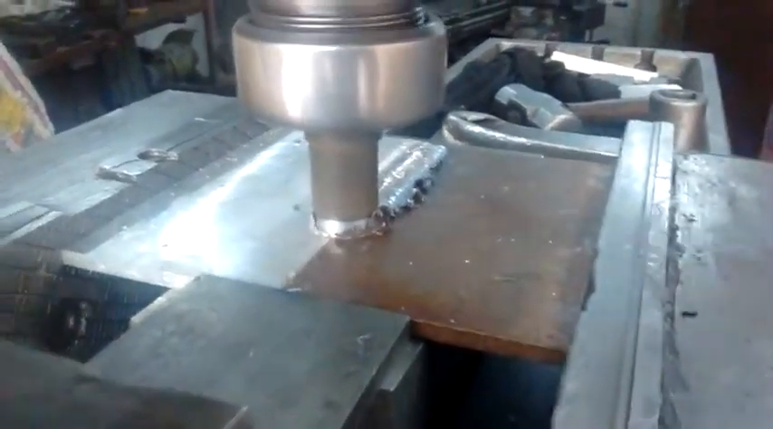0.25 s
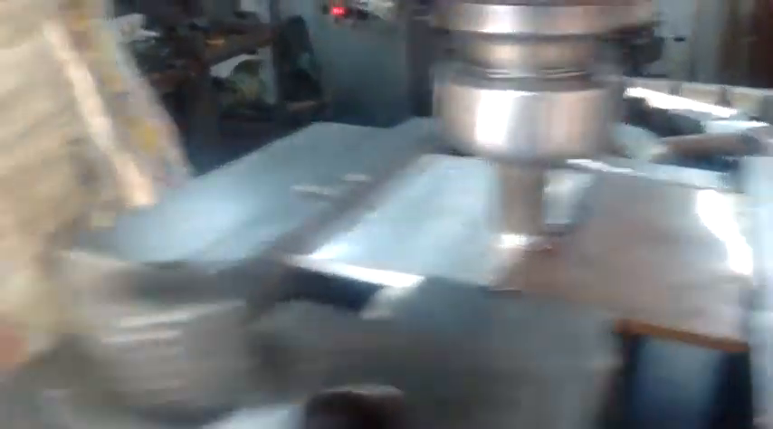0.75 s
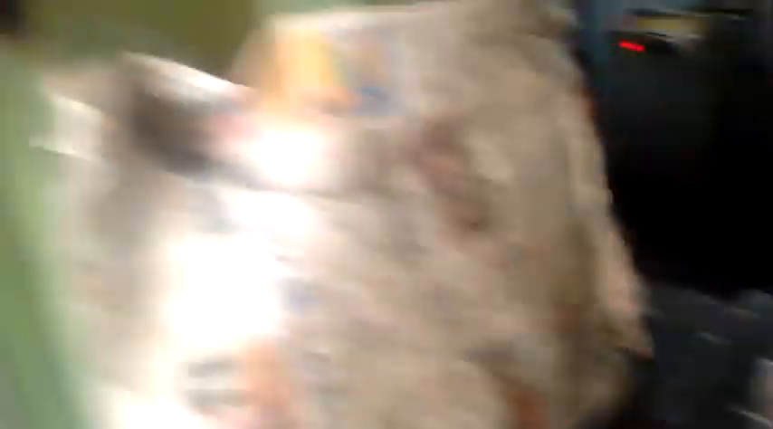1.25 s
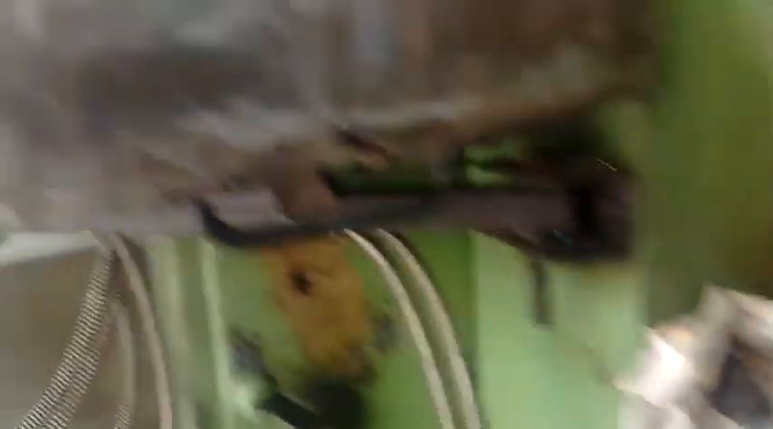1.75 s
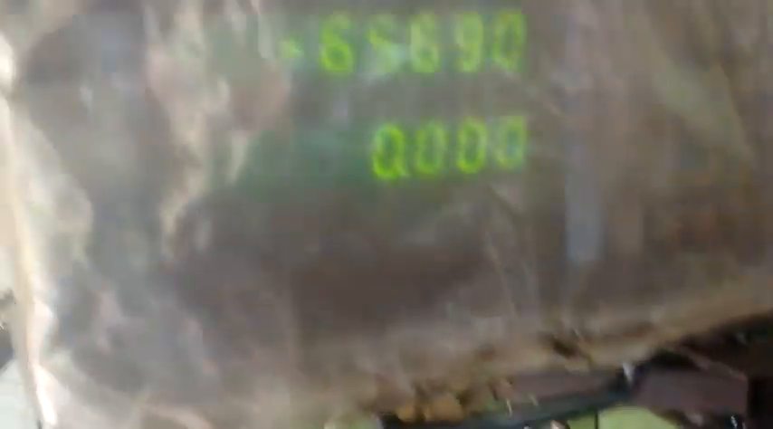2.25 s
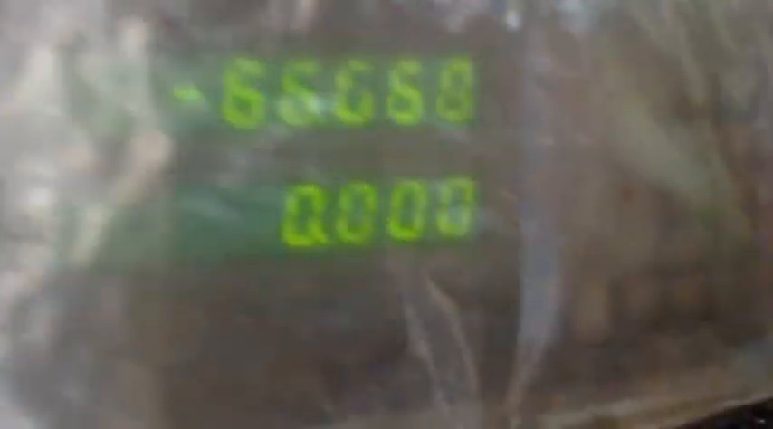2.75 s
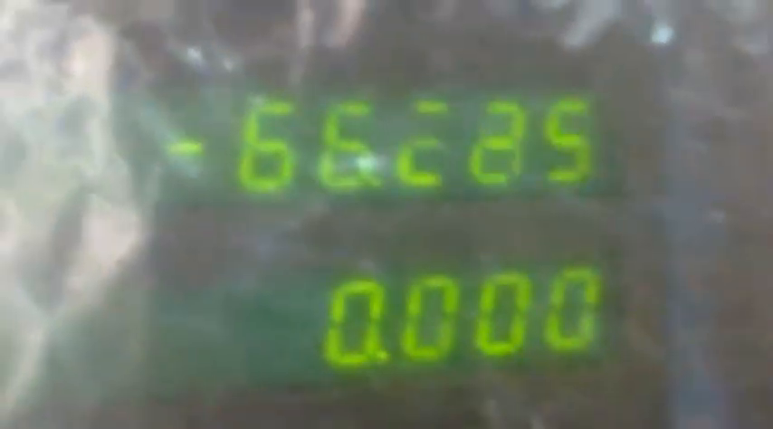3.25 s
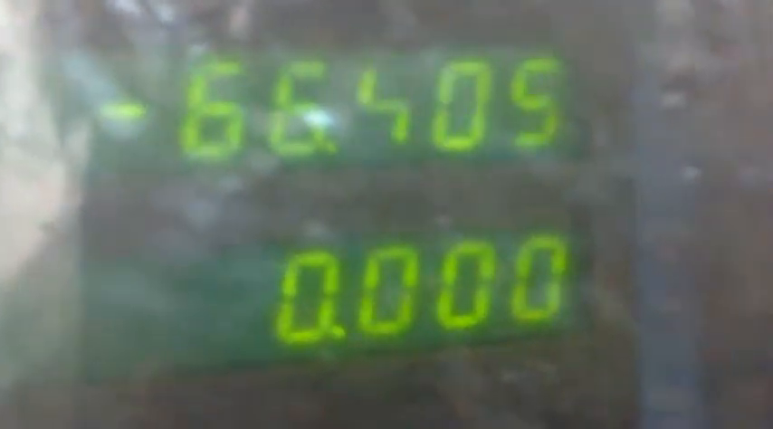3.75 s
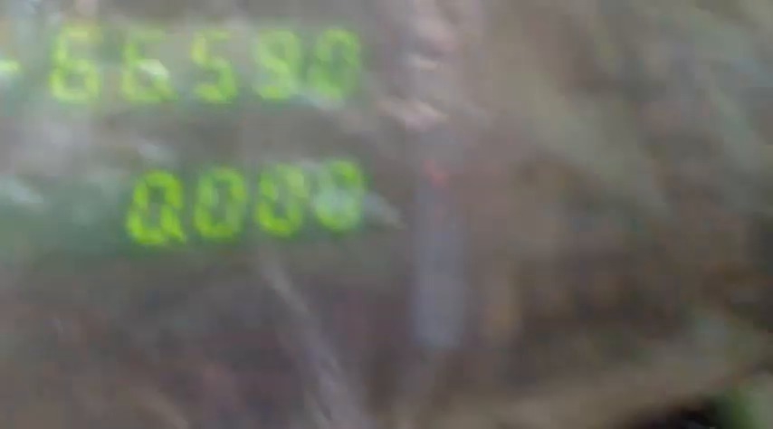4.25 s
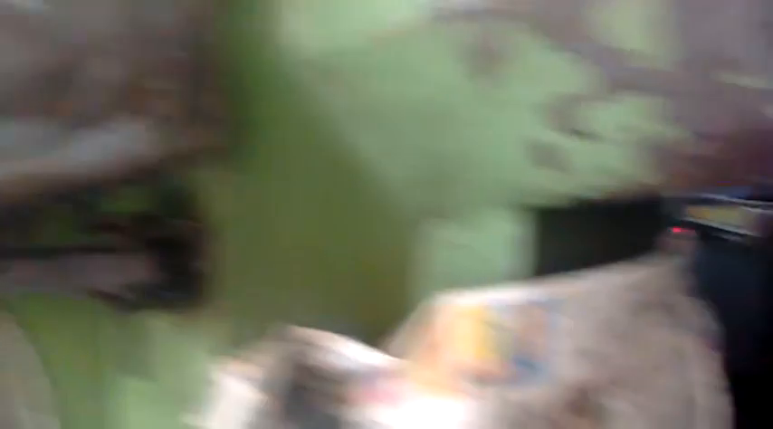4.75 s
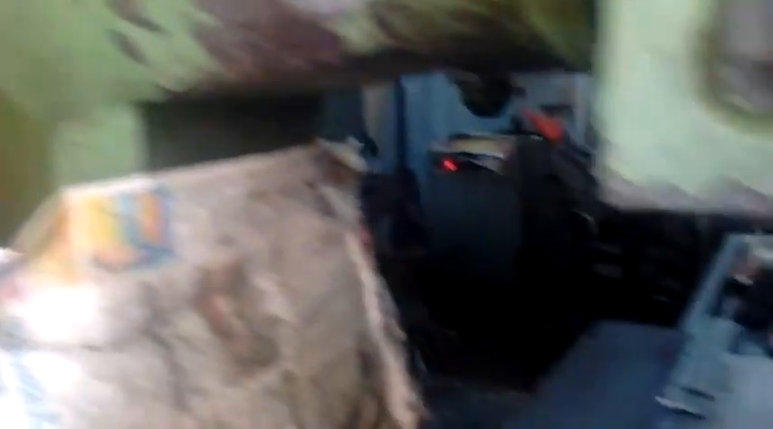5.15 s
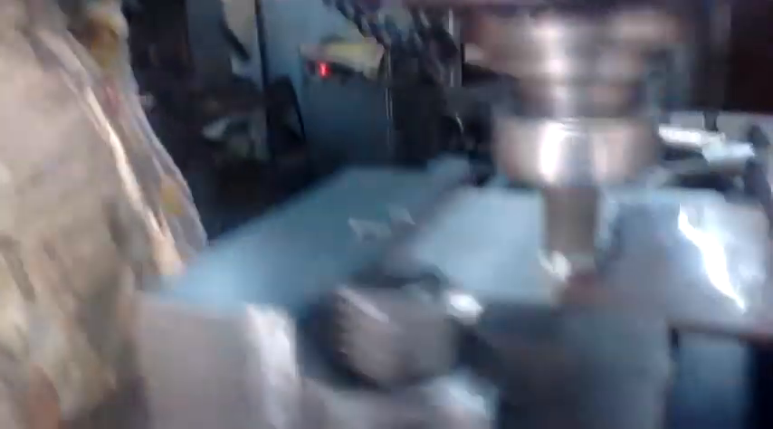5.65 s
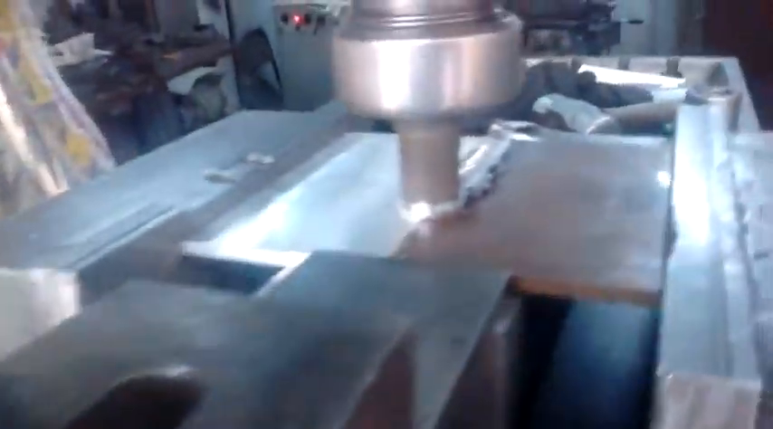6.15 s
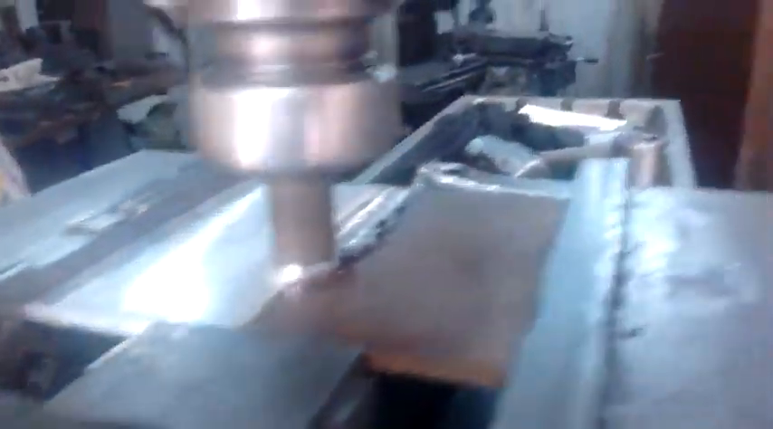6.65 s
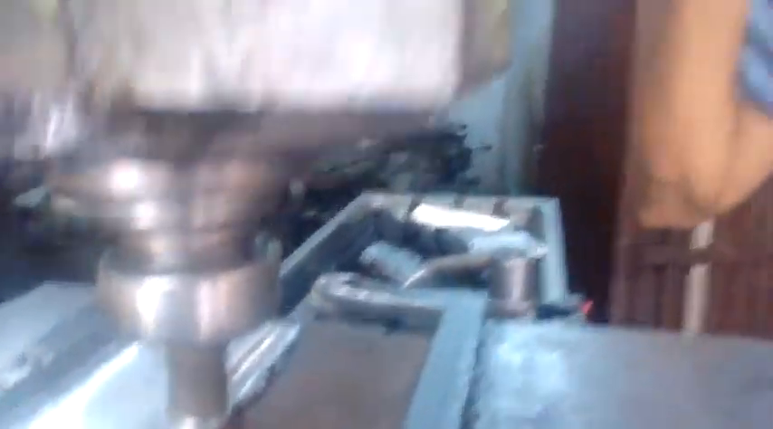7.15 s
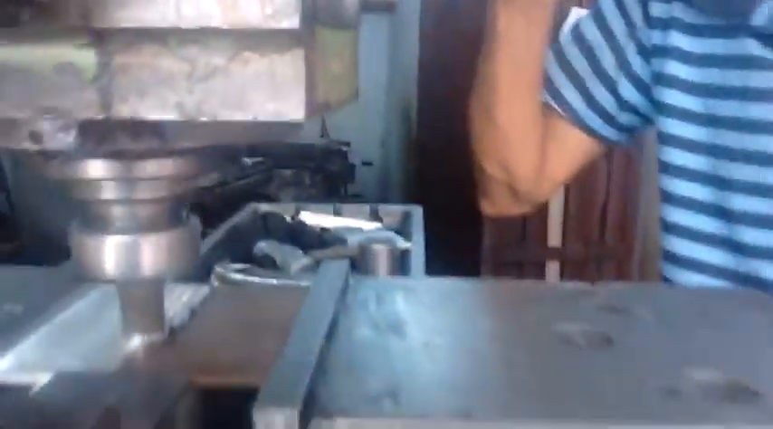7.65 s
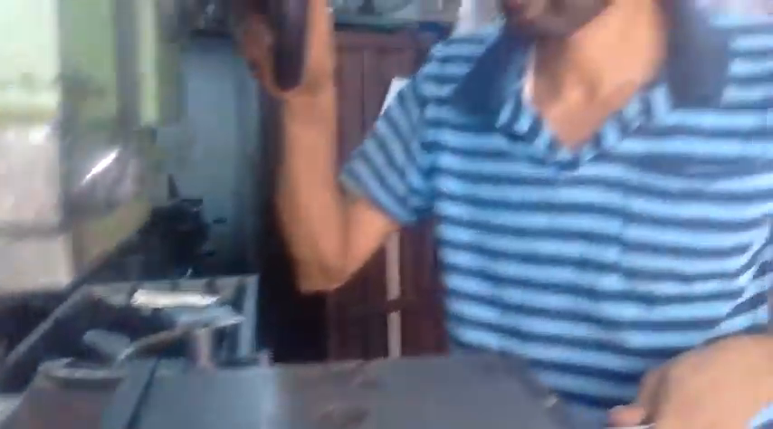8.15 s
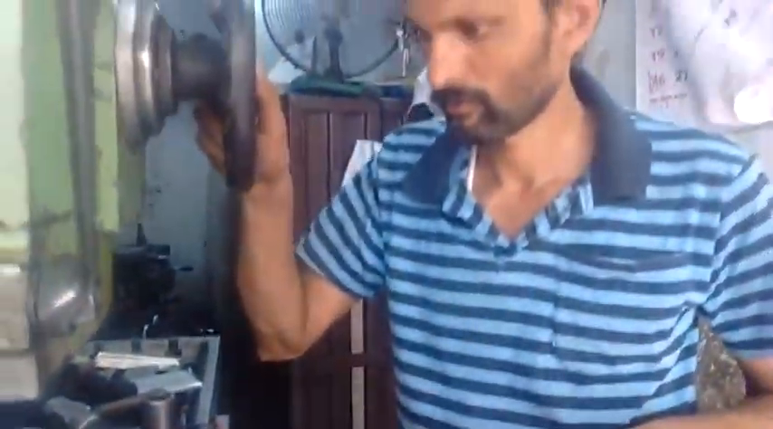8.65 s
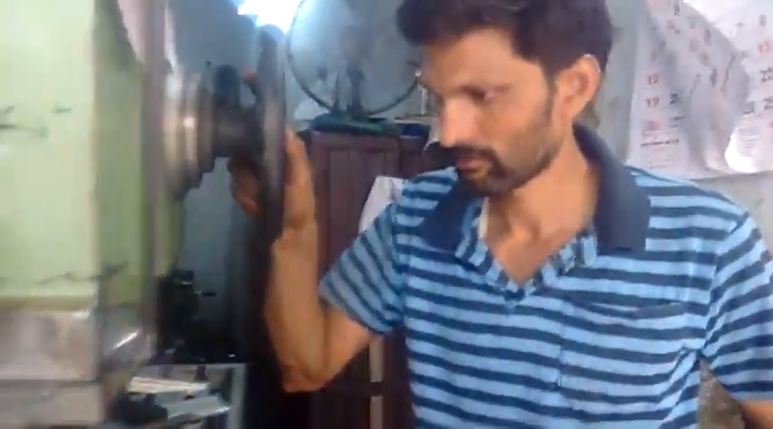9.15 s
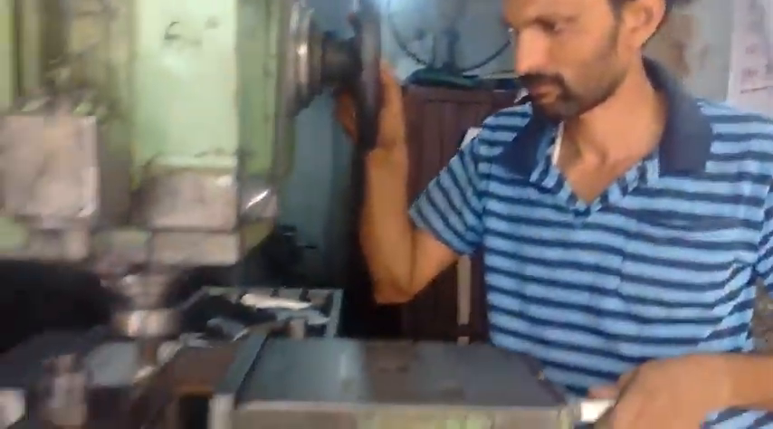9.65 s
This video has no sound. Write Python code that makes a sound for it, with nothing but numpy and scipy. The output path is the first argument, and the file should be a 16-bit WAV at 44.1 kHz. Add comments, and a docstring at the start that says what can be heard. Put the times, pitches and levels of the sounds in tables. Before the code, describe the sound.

Steady mechanical noise from a milling machine fills a small workshop, heard from a close, moving microphone. Several gear and motor whines take turns growing louder and softer above the rattling gearbox. The cutter scrapes and hisses through steel, with occasional faint crackles and rings. The lowest whine chatters briefly at the start, and toward the end come a short groan and two dry squeaks, one falling and one rising.

```python
"""Vertical mill cutting a slot in steel plate

Gears, motor and feed drive whine over the rattle of the gearbox. The cutter scrapes, rings and
crackles in step with the spindle; now and then the machine judders or squeaks. Cutting load drives
rattle, hiss and the lowest whine. The whines swell and fade as a hand-held phone moves round the
machine, through the loud and dead spots of a small workshop."""
import sys
import numpy as np
from scipy import signal
from scipy.fft import rfft, irfft
from scipy.io import wavfile
from scipy.ndimage import uniform_filter1d, minimum_filter1d

SR = 44100
rng = np.random.default_rng(int(sys.argv[2]) if len(sys.argv) > 2 else 0)


def to_wav(s):
    """Save 16-bit WAV."""
    ch = np.atleast_2d(s).T  # columns
    pcm = np.round(np.clip(ch, -1, 1) * 32767)  # PCM
    wavfile.write(sys.argv[1], SR, pcm.astype(np.int16))


N = 437031
TIME = np.arange(N) / SR
FREQ = np.arange(N // 2 + 1) * SR / N + 1e-3
SIDES = np.array([[1], [-1]])  # left, right

SPINDLE_HZ, TOOTH_HZ, SHAFT_HZ, MOTOR_HZ = 4.37, 13.59, 15.17, 22.6
GEAR_HZ, FEED_HZ = 53.31, 156.26
# likeness of the two channels (frequency [Hz], correlation [-1..1])
CORRELATION = [(60, .35), (130, .57), (300, .42), (550, .75), (750, .62), (1300, .92), (1800, .85),
               (2450, -.4), (3100, -.89), (3500, -.65), (4300, .62), (4900, .88), (6100, -.88),
               (6700, -.92), (8000, .78), (9600, -.5), (11000, -.2), (12300, .5), (14000, -.8), (15200, .8)]


def whines(load_db, place_m, trim_db=-1.57):
    """Gear meshes and feed drive sing; the lowest whine follows the load, throbs and chatters."""
    # (frequency [Hz]): 2 multiples of the gear rate, 4 of the feed drive, 3 more of the gear rate
    whine_hz = [11 * GEAR_HZ, 24 * GEAR_HZ, 3 * FEED_HZ, 9 * FEED_HZ, 13 * FEED_HZ, 14 * FEED_HZ, 22 *
                GEAR_HZ, 36 * GEAR_HZ, 60 * GEAR_HZ]
    # whines 1-6, loud and dead spots (level [dB], [(place [m], radius [m], lift [dB]), ...])
    room_spots = [(-20, [(0.3, 0.038, -16), (0.33, 0.08, -6), (0.67, 0.084, 1), (0.011, 0.13, 1.7)]),
                  (-40.5, [(0.41, 0.19, 15.5), (-0.266, 0.064, 18), (-0.53, 0.12, 17.5)]),
                  (-36, [(.42, 0.097, 10), (.64, 0.15, 11)]), (-37.5, [(0.162, 0.06, 9.5),
                  (0.013, 0.15, 13.5), (-0.25, 0.034, 12.5)]), (-42.5, [(0.19, 0.046, 5),
                  (0.069, 0.18, 17.5), (-0.166, 0.095, 17), (-0.83, 0.21, 13)]),
                  (-33.5, [(0.278, 0.052, 7.5), (-0.79, .12, 13), (0.61, 0.16, -20)])]
    # whines 7-9, each swelling and fading on its own level curve (time [s], level [dB])
    level_curves = [
        [(0, -24), (.5, -39), (1.05, -25), (1.47, -38), (1.63, -18), (1.8, -14.5), (2.05, -12.5), (2.72, -14),
         (3, -18.5), (3.3, -20.5), (4, -19.5), (4.42, -16), (4.72, -19), (4.9, -29), (5.27, -19), (5.9, -36),
         (7.3, -32), (7.65, -23), (7.9, -26.5), (8.25, -22), (8.85, -21.5), (9.3, -28), (9.9, -30)],
        [(0, -21), (.6, -25), (.95, -21), (1.15, -23.5), (1.4, -29), (1.9, -36), (2.4, -26.5), (3.1, -24.5),
         (3.32, -21), (4.1, -23), (4.65, -30), (4.85, -24), (5.15, -22.5), (5.5, -35), (5.75, -26.5),
         (6.5, -24.5), (7.2, -33), (7.8, -26), (8.42, -31), (8.7, -20.5), (8.95, -18.5), (9.15, -22),
         (9.35, -31), (9.9, -26)],
        [(0, -40), (.88, -38), (.95, -29), (1.03, -23), (1.15, -27), (1.3, -28), (1.8, -35), (2.2, -27.5),
         (2.85, -34), (3, -25.5), (3.4, -31), (3.6, -27), (4, -28), (4.25, -30), (4.55, -35), (4.9, -36),
         (4.97, -28), (5.08, -27), (5.28, -29.5), (5.45, -34), (7.4, -28), (7.6, -22), (7.75, -31), (8.4, -39),
         (8.6, -29), (8.85, -29), (8.97, -37), (9.43, -32), (9.6, -24), (9.75, -26), (9.9, -28)],
    ]
    # cutter chatter at the lowest whine (time [s], length [s], level [dB])
    chatters = [(0.01, 0.076, -19), (0.222, 0.078, -10), (0.443, 0.08, -15), (6.186, 0.085, -18),
                (6.672, 0.13, -21), (8.927, 0.061, -18)]
    # tones that come and go with whine 7 (frequency [Hz], relative level [dB])
    overtones = [(2558.4, -16), (3941, -27.5), (5117, -33)]
    # highest whine, a thin whistle, between channels (time [s], phase lag [rad])
    whistle_lag = [(0, 2.6), (1.1, 2.5), (2.2, 2.4), (3, 2.4), (4, 2.3), (5.1, 1.5), (6, 3.1), (7.6, 2.75),
                   (8.7, 2), (9.6, 2.45)]
    drift_s = np.cumsum(0.000451 * walk(2)) / SR + .000025 * turn(SHAFT_HZ, 0)
    gains = [undb(trim_db + db + standing_waves(place_m, spots)) for db, spots in room_spots]
    gains += [undb(trim_db + curves(level)[0]) for level in level_curves]
    chatter = sum(undb(db) * np.exp(-(2 * (TIME - s) / length) ** 4) for s, length, db in chatters)
    lowest = gains[0] * undb(0.53 * load_db) + .5 * chatter
    # each cutter tooth loads the gears; a fast random flutter roughens the tone
    throb = (1 + 0.08 * turn(TOOTH_HZ, 0.058)) * undb(1.6 * walk(110))
    out = lowest * throb * tone(whine_hz[0], drift_s, wander_rad=0.19)
    for hz, gain in zip(whine_hz[1:-1], gains[1:-1]):
        uneven_teeth = undb(0.69 * walk(70))
        out += gain * uneven_teeth * tone(hz, drift_s, wander_rad=0.12)
    stutter = 1 - .8 * np.clip(walk(30) - 1.2, 0, 1)
    lag_rad, = curves(whistle_lag)
    whistle = tone(whine_hz[-1], drift_s, flutter_db=0.9, wander_rad=0.13, lag_rad=lag_rad)
    out += gains[-1] * stutter * whistle
    for hz, db in overtones:
        out += gains[6] * undb(db + 2.5 * walk(14)) * tone(hz, drift_s, flutter_db=2.0)
    return out + drive_tones(place_m, drift_s)


def drive_tones(place_m, drift_s):
    """Weaker steady tones of motor, gears and feed drive; those near 630 Hz beat."""
    # (frequency [Hz], level [dB], slope along the phone's path [dB/m])
    tones = [(116, -44, 5), (213.2, -40, -2), (248, -44, -2), (276, -40.5, 1), (622.7, -39, 6),
             (625, -35, 1), (629.8, -36, -3), (633.8, -37, -2), (639.5, -37.5, 0), (679.6, -35.5, 8),
             (781.2, -35, -2), (897, -41.5, 9), (937.5, -44, -2), (986, -38, 0), (1150.3, -37, 0),
             (1250, -43, 0), (1359, -48, 0), (1759.4, -38, -3), (1875.1, -38, 0), (1902.5, -39, 0),
             (2017, -39, -4), (2345, -36, 0), (2657, -44, 0), (2886, -39.5, 0)]
    out = 0
    for hz, db, db_per_m in tones:
        gain = undb(db + db_per_m * place_m + 2.0 * walk(1.37))
        out += gain * tone(hz, drift_s, flutter_db=1.16, wander_rad=0.41)
    return out


def gearbox(place_m, level_db=-16, ripple_db=2.0, sway_db=0.23, low_db_per_m=2, judder_s=0.016):
    """Teeth and bearings knock densely, pulsing with the shafts, and ring casting and room."""
    # (frequency [Hz], spectral density [dB])
    rattle_shape = [(20, -32), (55, -16.5), (110, -13), (210, -8.5), (320, -11.5), (400, -7.5), (520, -6),
                    (750, -5), (1350, -5), (1750, -7), (2100, -8), (2450, -9.5), (2950, -12.5),
                    (4200, -21.5), (6000, -52.5)]
    # column and gear housing (frequency [Hz], width [Hz], lift [dB])
    casting_modes = [(254.6, 7.1, 4), (540, 36, 4), (616, 34, 4.5), (717, 77, 3), (945, 49, 5),
                     (1370, 33, 4.5), (1585, 67, 2.5), (2023, 290, 3), (2218, 33, 4), (2560, 67, -1),
                     (3160, 56, 8)]
    # band offsets (low [dB], middle [dB], upper [dB])
    bands_db = (1, 0.37, -1.16)
    # short coarse bursts (time [s], low lift [dB], middle lift [dB], upper lift [dB])
    judders = [(0.729, 3.5, 1.7, 1), (1.185, -4, 5.5, -3), (3.257, 5, 2.3, 0), (4.858, -8, 3.8, 3.5),
               (5.056, 0, 1.6, 3), (5.78, 4, 1.5, 2), (6.451, 3, 1.7, 2), (7.163, 1, 2.5, 5),
               (8.053, 5, 4.4, 2), (9.647, 6, 3.9, -1)]
    # local booms (frequency [Hz], half width [Hz], place [m], radius [m], lift [dB])
    room_modes = [(170, 24, 0.32, 0.095, 6.5), (185, 27, 0.65, 0.073, 4.5), (203, 45, 0.011, 0.22, 4.5),
                  (272, 17, 0.36, 0.071, -2), (314, 30, -.58, 0.11, 4), (360, 10, .41, 0.13, 11.5)]
    # (time [s], level [dB])
    bass_level = [(0, -1), (.9, -3), (1.3, -2), (2.1, 1), (3.6, 2.5), (5.4, 2), (6, 0), (7.2, -1.5),
                  (7.75, 2), (8.3, -3.5), (8.9, -5), (9.4, 3), (9.9, -2)]
    swing = (0.038 * turn(SPINDLE_HZ, 0.046) + 0.01 * turn(MOTOR_HZ, 0.025)
             + 0.027 * turn(SHAFT_HZ, 0.013))
    casting_db = sum(db / (1 + (2 * (FREQ - hz) / width) ** 2) for hz, width, db in casting_modes)
    weak_modes_db = ripple_db * unit(uniform_filter1d(rng.standard_normal(len(FREQ)), size=130))
    knocks = impacts(per_s=12000, spread_db=2.17) * (1 + swing)
    rattle = radiate(knocks, undb(across(rattle_shape) + casting_db + weak_modes_db))
    spectrum = rfft(rattle)
    bass = irfft(spectrum / (1 + (FREQ / 135) ** 8), N)
    low = irfft(spectrum / (1 + (FREQ / 470) ** 6), N)
    upper = irfft(spectrum / (1 + (1450 / FREQ) ** 8), N)
    middle = rattle - low - upper
    judders_db = sum(np.array(dbs)[:, None] * bell(TIME - s, judder_s) for s, *dbs in judders)
    # each band sways as the phone turns
    low_db, middle_db, upper_db = (db + sway_db * walk(3) + judder_db
                                   for db, judder_db in zip(bands_db, judders_db))
    low_db += low_db_per_m * place_m
    booms = 0
    for hz, width, at, radius, db in room_modes:
        mode = irfft(spectrum * bell(FREQ - hz, width), N)
        booms += mode * (undb(db * bell(place_m - at, radius)) - 1)
    lows = (low - bass) * undb(low_db) + bass * undb(curves(bass_level)[0]) + booms
    thrum = 1 + 0.056 * turn(SHAFT_HZ, 0.0067) + 0.083 * turn(2 * SHAFT_HZ, 0.045)
    return undb(level_db) * (lows * thrum + middle * undb(middle_db) + upper * undb(upper_db))


def cutter(load_db, level_db=-35, bite_s=0.012, tooth_depth=0.087):
    """Teeth shear the steel in scrapes of tiny slips; breaking chips sizzle above."""
    # (frequency [Hz], spectral density [dB])
    hiss_shape = [(1800, -19.5), (3300, -0.5), (4200, 0), (5000, -3), (6000, -10.5), (7500, -8),
                  (9000, -11.5), (10200, -11), (11600, -25), (15000, -42)]
    # a tooth bites hard (time [s], strength [dB])
    hard_bites = [(0.741, -7), (1.155, -9), (2.579, -10), (2.949, -2), (3.247, -2.0), (3.312, -3),
                  (4.856, -12), (5.734, -3), (6.166, 2), (6.316, -11), (6.457, -11), (6.76, -13),
                  (7.052, -6), (7.106, -5), (7.651, -4), (7.789, -11), (8.921, -2)]
    bites = sum(undb(db) * bell(TIME - s, bite_s) for s, db in hard_bites)
    pulse = 1 + tooth_depth * turn(TOOTH_HZ, 0.057) + 0.047 * turn(SHAFT_HZ, 0.015)
    force = undb(0.61 * load_db + 0.5 * walk(35)) * pulse
    scrape = radiate(impacts(per_s=30000, spread_db=1.5), undb(across(hiss_shape)))
    # a hard bite mostly rings the cutter, below the fine hiss
    ring = irfft(rfft(scrape) / (1 + (FREQ / 5800) ** 6), N)
    shear = scrape * force + bites * (1.2 * ring + 0.18 * scrape)
    return undb(level_db) * shear + sizzle() * np.sqrt(force)


def cutting_load(runout_db=0.3, oval_db=.5, heaviest_s=0.04, uneven_steel_db=0.34):
    """Load [dB]: depth of cut, surges, and the swing of a cutter slightly out of true."""
    # depth of cut (time [s], load [dB])
    depth = [(0, 2), (.6, 2.5), (1.2, 3), (1.8, 1), (3.2, -1), (3.8, 1), (4.5, 1.3), (5.1, 0.6), (6.2, 2),
             (7.5, 1), (8.4, 1.2), (9.9, 0.5)]
    # cutter runs light or digs in (time [s], length [s], load [dB])
    surges = [(0.358, 0.087, -4), (0.843, .08, -3.5), (2.853, 0.11, -4), (3.143, 0.13, -3),
              (4.033, 0.16, -5.5), (4.555, 0.14, -7), (6.2, 0.18, -3.5), (6.896, 0.17, -4.5),
              (7.786, 0.092, 4), (7.885, 0.058, -1.5), (8.396, 0.15, -7.5), (9.303, 0.12, -1.5)]
    surges_db = sum(db * bell(TIME - s, length / 2) for s, length, db in surges)
    swing_db = runout_db * turn(SPINDLE_HZ, heaviest_s) + oval_db * turn(2 * SPINDLE_HZ, heaviest_s)
    return curves(depth)[0] + surges_db + swing_db + uneven_steel_db * walk(12)


def sizzle(level_db=-49.5, half_width_hz=750):
    """Airy high hiss with one brighter band sinking from about 15 to 12 kHz."""
    # (time [s], frequency [Hz])
    band_centre = [(0, 14800), (.5, 14500), (1, 13200), (4.8, 13100), (6.2, 12200)]
    # (time [s], level [dB])
    envelope = [(0, 0), (.7, 2), (1.05, -5.5), (2.2, -9), (3.2, -11), (4.1, -10), (4.8, -6), (5.2, -0.5),
                (5.55, -5.5), (6.4, -1.5), (7, -4), (7.4, -5), (8.3, -17), (8.95, -5), (9.7, -16)]
    cracks = impacts(per_s=11000, spread_db=3.3)
    air = radiate(cracks, 1 / (1 + (9000 / FREQ) ** 8) / (1 + (FREQ / 11000) ** 3))
    centre_hz, = curves(band_centre)
    mid, side = noise_pair(1 / (1 + (FREQ / half_width_hz) ** 4))
    band = unit((mid + SIDES * side) * np.cos(2 * np.pi * np.cumsum(centre_hz) / SR))
    spurts_db = 1.8 * walk(40) + .8 * turn(SHAFT_HZ, .016)
    return (band + 1.8 * air) * undb(level_db + curves(envelope)[0] + spurts_db)


def rings(half_width_hz=70):
    """Slips of a rubbing tooth briefly ring one resonance of the cutter."""
    # (time [s], length [s], pitch [Hz], level [dB])
    rubs = [(.44, .05, 3750, -39), (.55, .08, 3750, -40), (.725, .06, 4220, -37), (.79, .07, 4220, -37),
            (.865, .05, 4240, -36), (.94, .07, 4350, -37), (1.02, .05, 4250, -39), (4.475, .06, 3940, -34),
            (4.635, .08, 3940, -40), (5.3, .025, 3920, -36)]
    slips = noise_pair(1 / np.sqrt(1 + (FREQ / half_width_hz) ** 2) / (1 + (FREQ / 600) ** 4))
    out = np.zeros(N)
    for s, length, hz, db in rubs:
        near = np.abs(TIME - s) < 2 * length
        phase = 2 * np.pi * hz * TIME[near]
        ring = slips[0, near] * np.cos(phase) + slips[1, near] * np.sin(phase)
        out[near] += undb(db) * bell(TIME[near] - s, length / 2) * ring
    return out


def squeaks(jitter=.015, lag_rad=.9):
    """Dry metal sticks and slips in two short, rough glides: one falls, one rises."""
    # each (time [s], pitch [Hz], level [dB])
    glides = [
        [(9.17, 2260, -31), (9.195, 2190, -27), (9.203, 2040, -17), (9.211, 1950, -18), (9.217, 1650, -26),
         (9.224, 1340, -18.5), (9.245, 1330, -27), (9.268, 1230, -22)],
        [(9.403, 1600, -26), (9.415, 1890, -25), (9.427, 2010, -18), (9.438, 2020, -24), (9.447, 2000, -18),
         (9.46, 1960, -27)],
    ]
    out = 0
    for glide in glides:
        hz, db = curves(glide)
        gate = uniform_filter1d(1. * ((TIME > glide[0][0]) & (TIME < glide[-1][0])), size=220)
        phase = 2 * np.pi * np.cumsum(hz * (1 + jitter * walk(400))) / SR
        out += gate * undb(db) * np.sqrt(2) * np.sin(phase - SIDES * lag_rad / 2)
    return out


def groan(at_s=8.96, length_s=.14, hz=632, level_db=-16.5):
    """One of the beating machine tones swells once, just above the lowest whine."""
    return undb(level_db) * bell(TIME - at_s, length_s / 2) * tone(hz, drift_s=0)


def chips(ping_hz=9900, decay_s=.004):
    """Flying chips land on steel, one tiny ping each."""
    # (time [s], level [dB])
    landings = [(.672, -37), (5.02, -31), (5.113, -36)]
    pings = sum(undb(db) * (TIME > s) * np.exp(-np.abs(TIME - s) / decay_s) for s, db in landings)
    return pings * np.sqrt(2) * np.sin(2 * np.pi * ping_hz * TIME)


def standing_waves(place_m, spots, ripple_db=0.15):
    """Lift [dB] of one whine at the phone: loud and dead spots plus a fine random ripple."""
    return sum(db * bell(place_m - at, radius) for at, radius, db in spots) - ripple_db * walk(4.22)


def patchy(x, depth_db=1.0):
    """Neighbouring modes are struck harder or softer together for about 0.1 s."""
    _, _, frames = signal.stft(x, nperseg=1024)
    chance = rng.standard_normal(frames.shape[1:])
    patches = unit(uniform_filter1d(uniform_filter1d(chance, size=5, axis=0), size=9, axis=1))
    return signal.istft(frames * undb(depth_db * patches))[1][:, :N]


def tone(hz, drift_s, flutter_db=1.0, wander_rad=0.46, lag_rad=None):
    """Machine tone: follows the shaft's drift, flutters, reaches the channels out of step."""
    phase = 2 * np.pi * hz * (TIME + drift_s) + wander_rad * walk(5)
    if lag_rad is None:
        correlation = across(CORRELATION, hz)
        lag_rad = np.arccos(correlation) * (.5 * walk(0.96) if correlation > 0 else 1)
    return np.sqrt(2) * undb(flutter_db * walk(24)) * np.sin(phase - SIDES * lag_rad / 2)


def impacts(per_s, spread_db):
    """Two trains of dense, tiny blows of uneven size."""
    hit = rng.random(N) < per_s / SR
    return unit(hit * undb(spread_db * rng.standard_normal(N)) * rng.standard_normal((2, N)))


def radiate(forces, gain):
    """Colour two uncorrelated forces and spread them as mid and side."""
    mid, side = rfft(forces) * gain
    correlation = np.clip(across(CORRELATION), -.98, .98)
    return unit(irfft(mid * np.sqrt(1 + correlation) + SIDES * side * np.sqrt(1 - correlation), N))


def noise_pair(gain):
    """Two independent noises coloured by gain, rms 1."""
    return unit(irfft(rfft(rng.standard_normal((2, N))) * gain, N))


def walk(rate_hz):
    """Random levels held 1 / rate_hz s and smoothed twice; spread near 1."""
    hold = max(int(SR / rate_hz), 2)
    steps = np.repeat(rng.standard_normal(N // hold + 2), hold)
    return 1.244 * uniform_filter1d(uniform_filter1d(steps, hold), hold)[:N]


def turn(hz, peak_s):
    """Once-a-turn swing, highest at peak_s."""
    return np.cos(2 * np.pi * hz * (TIME - peak_s))


def bell(distance, radius):
    """Gaussian hump, 1 at distance 0."""
    return np.exp(-(distance / radius) ** 2)


def curves(table):
    """Table columns interpolated over time."""
    s, *columns = np.transpose(table)
    return [np.interp(TIME, s, column) for column in columns]


def across(table, hz=FREQ):
    """(frequency [Hz], value) points interpolated over log frequency."""
    points_hz, values = np.transpose(table)
    return np.interp(np.log(hz), np.log(points_hz), values)


def undb(db):
    return 10 ** (np.asarray(db) / 20)


def unit(x):
    """Scale to rms 1."""
    return x / np.sqrt(np.mean(x ** 2))


def scene():
    """The whole machine, heard from the moving phone."""
    # (time [s], place [m]): 0 at the cutter, + towards the readout, - towards the handwheel
    phone_path = [(0, -0.14), (.6, 0.2), (1.2, 0.177), (1.5, 0.32), (1.85, 0.39), (2.6, 0.42), (3.15, 0.57),
                  (3.9, 0.7), (4.35, 0.41), (4.6, 0.35), (4.85, 0.33), (5.1, 0.28), (5.35, 0.22),
                  (5.8, 0.17), (6.6, 0.0058), (7.2, 0.0073), (7.6, -0.31), (8.2, -0.21), (8.9, -0.58),
                  (9.9, -0.63)]
    # (time [s], left minus right [dB])
    pan = [(0, 1), (.8, 1.1), (1.7, 0), (3.4, -1), (4.6, -0.5), (5.6, 1), (7.4, 0.5), (8.8, 1.5),
           (9.9, 0.5)]
    load_db = cutting_load()
    place_m, = curves(phone_path)
    pan_db, = curves(pan)
    noise = patchy(gearbox(place_m) * undb(0.45 * load_db) + cutter(load_db))
    machine = noise + whines(load_db, place_m) + rings() + squeaks() + chips() + groan()
    return machine * undb(SIDES * pan_db / 2)


def record(dry, ceiling=.93, fade_s=.003, top_hz=15550):
    """The phone colours each channel and limits peaks; the sound eases in and out at both ends, and the top is
    cut."""
    # (frequency [Hz], left minus right [dB])
    balance = [(60, -1), (110, -9), (200, -2.5), (380, -3.5), (700, 1.5), (1290, 0.5), (2380, 1),
               (4400, 1.5), (8120, -1.5), (15000, 1)]
    sound = irfft(rfft(dry) * undb(SIDES * across(balance) / 2), N)
    headroom = np.minimum(1, ceiling / (np.abs(sound).max(axis=0) + 1e-9))
    gain = uniform_filter1d(minimum_filter1d(headroom, size=161), size=161)
    gain *= np.clip(np.minimum(TIME, TIME[-1] - TIME) / fade_s, 0, 1)
    lowpass = signal.ellip(14, .2, 80, top_hz, fs=SR, output="sos")
    return signal.sosfilt(lowpass, sound * gain)


dry = scene()
out = record(dry)
to_wav(out)
```